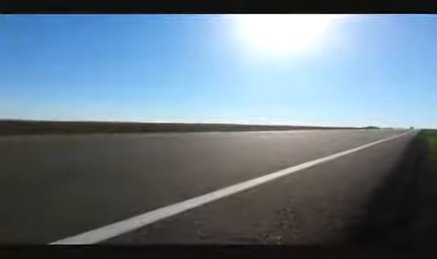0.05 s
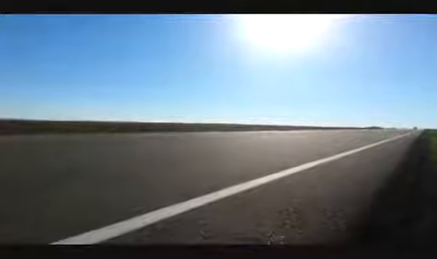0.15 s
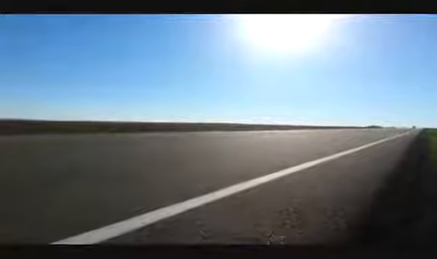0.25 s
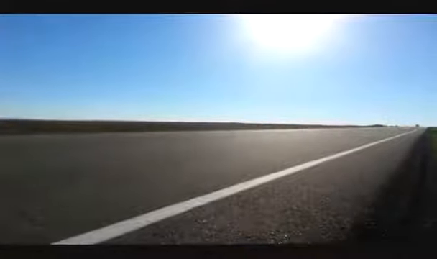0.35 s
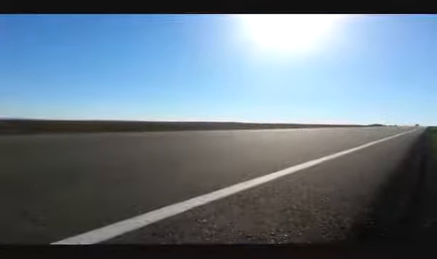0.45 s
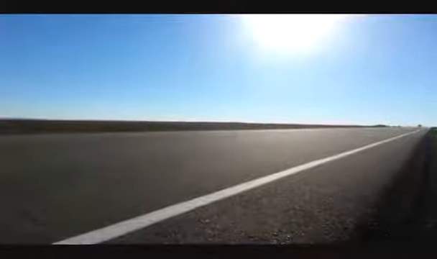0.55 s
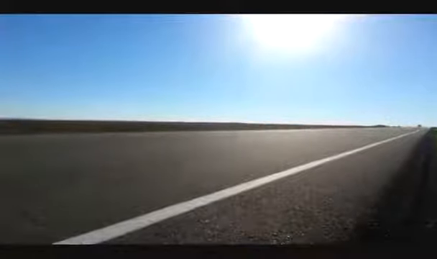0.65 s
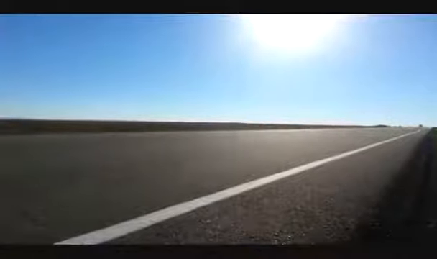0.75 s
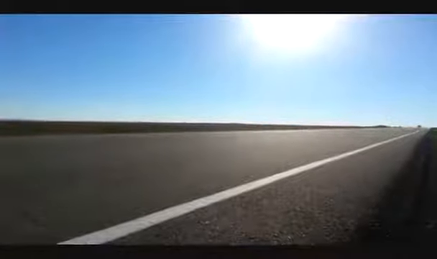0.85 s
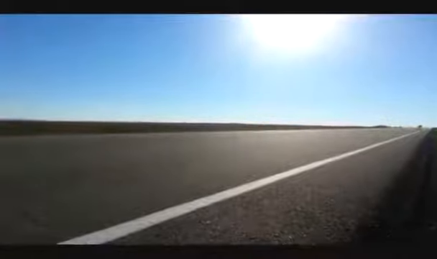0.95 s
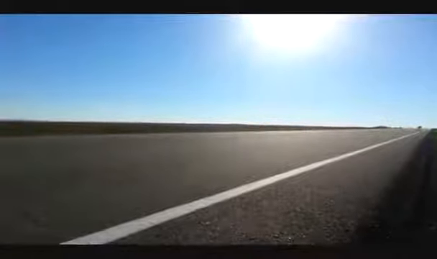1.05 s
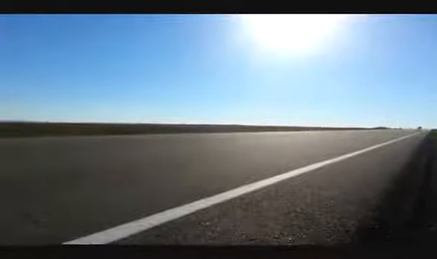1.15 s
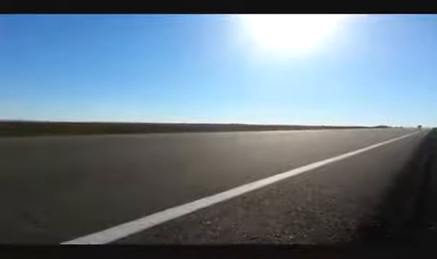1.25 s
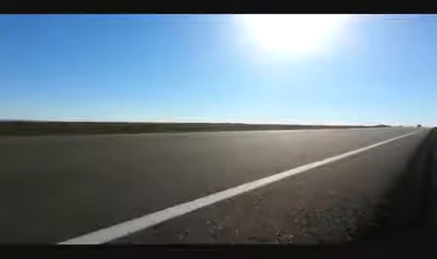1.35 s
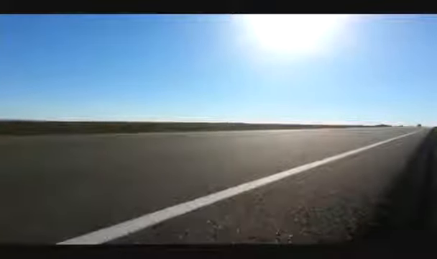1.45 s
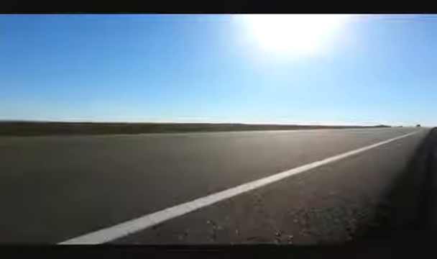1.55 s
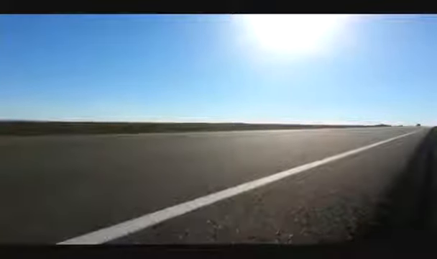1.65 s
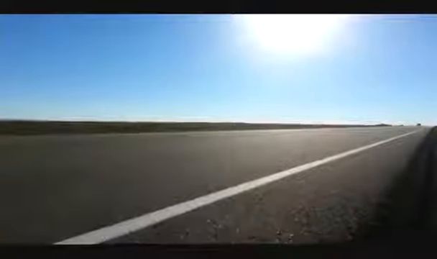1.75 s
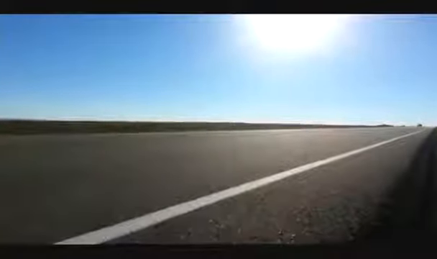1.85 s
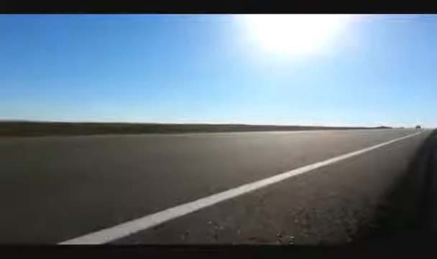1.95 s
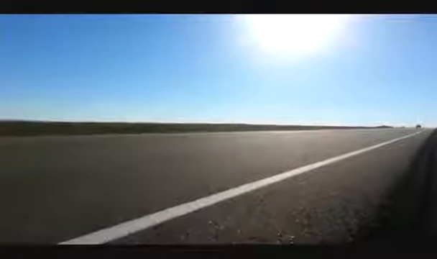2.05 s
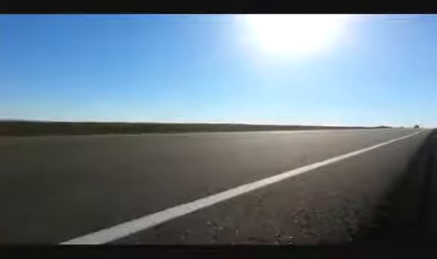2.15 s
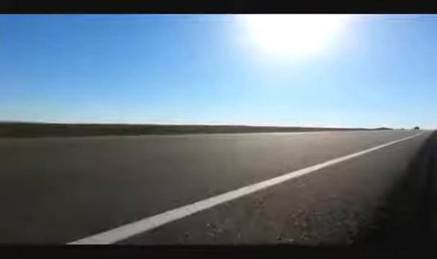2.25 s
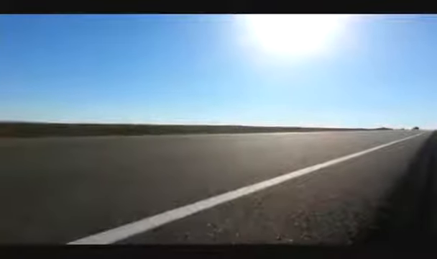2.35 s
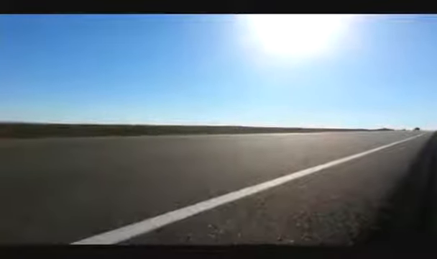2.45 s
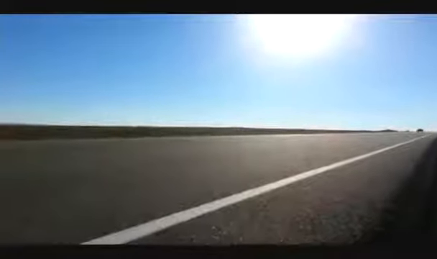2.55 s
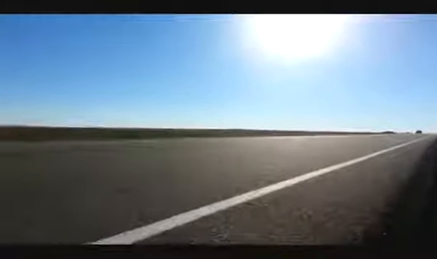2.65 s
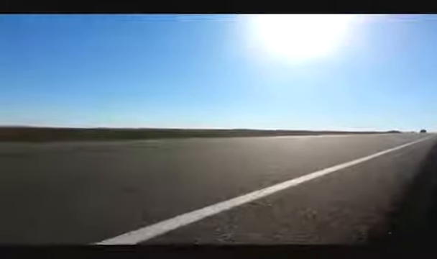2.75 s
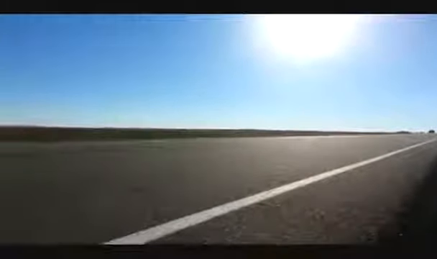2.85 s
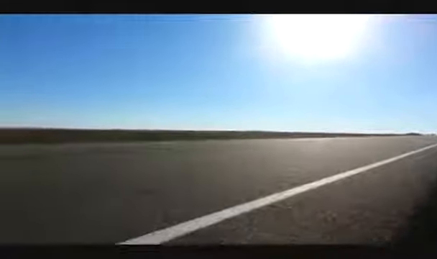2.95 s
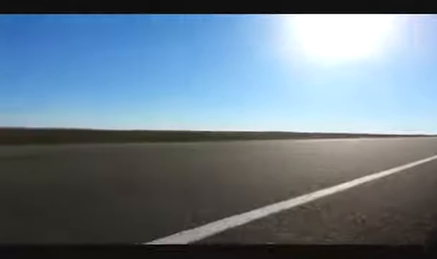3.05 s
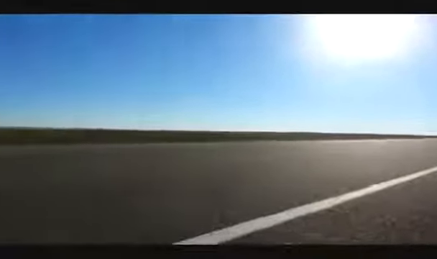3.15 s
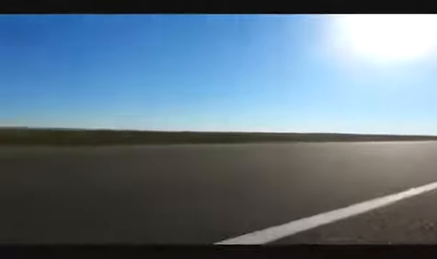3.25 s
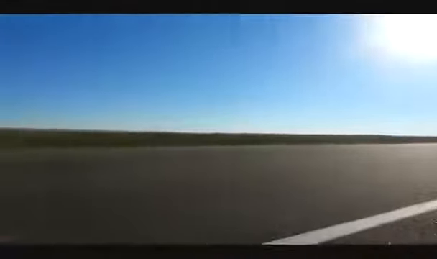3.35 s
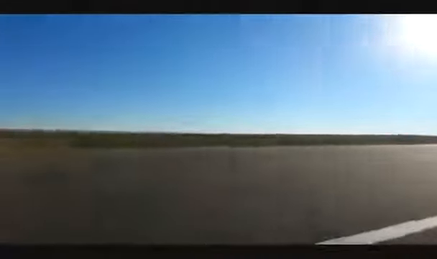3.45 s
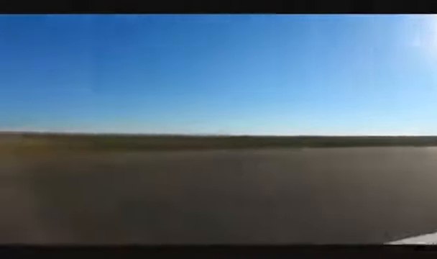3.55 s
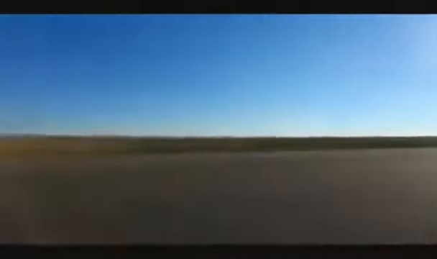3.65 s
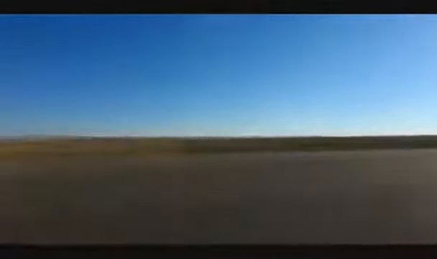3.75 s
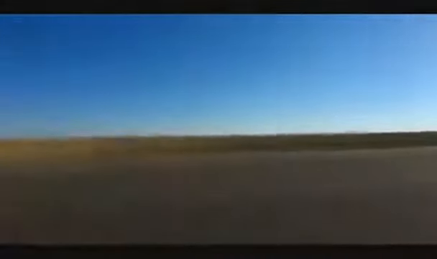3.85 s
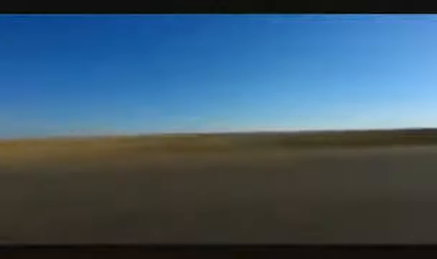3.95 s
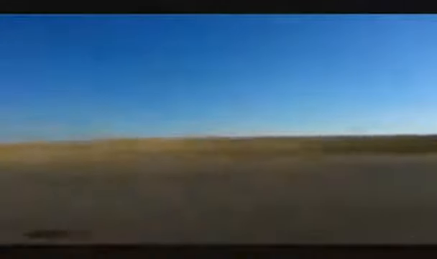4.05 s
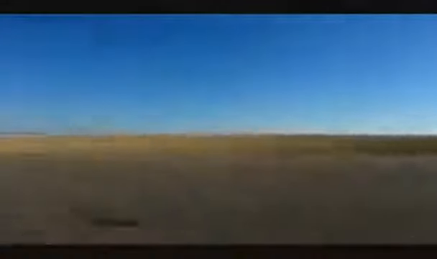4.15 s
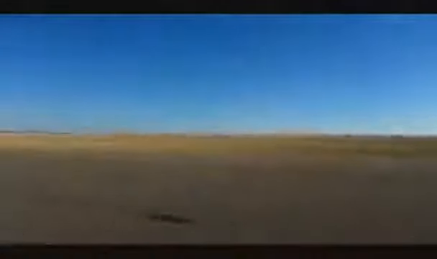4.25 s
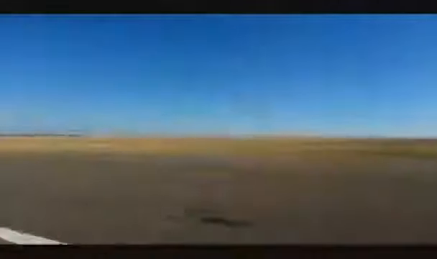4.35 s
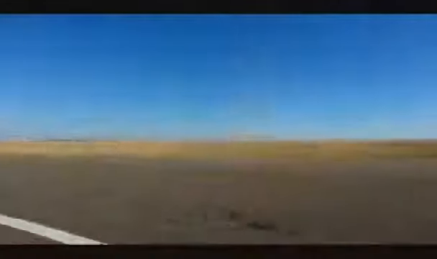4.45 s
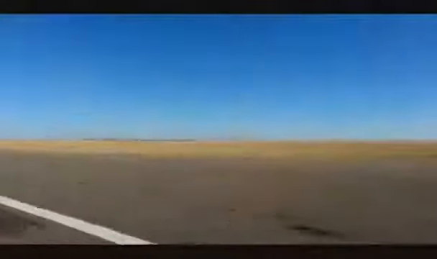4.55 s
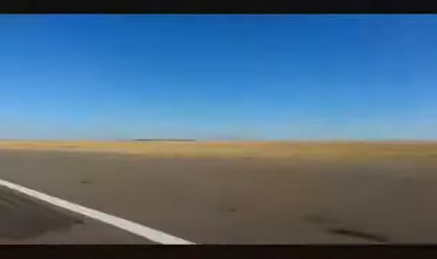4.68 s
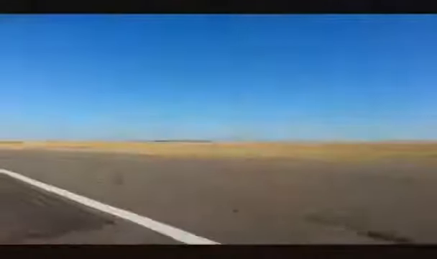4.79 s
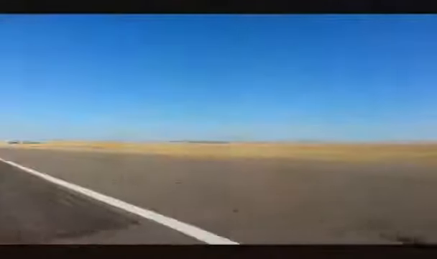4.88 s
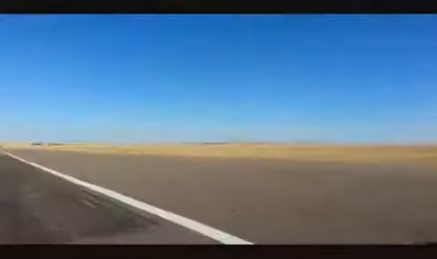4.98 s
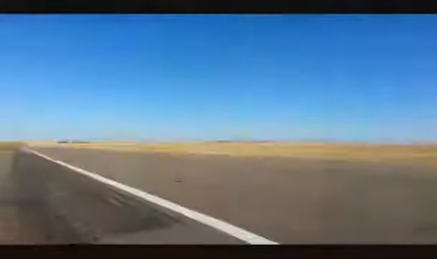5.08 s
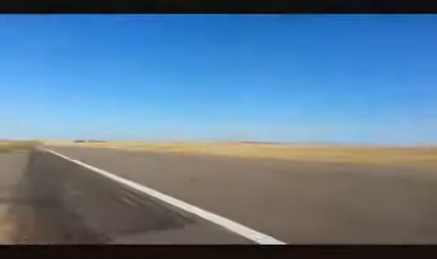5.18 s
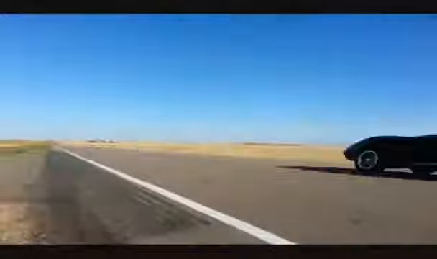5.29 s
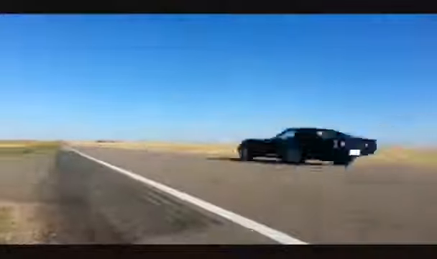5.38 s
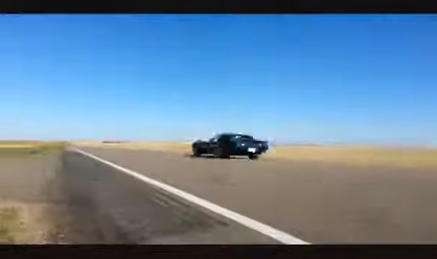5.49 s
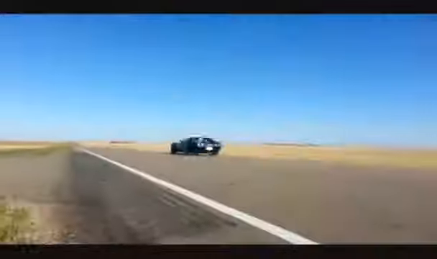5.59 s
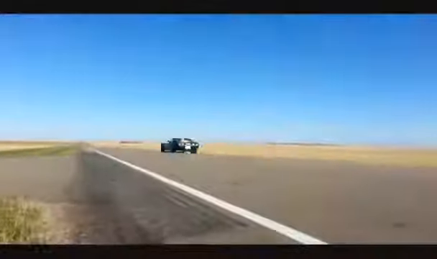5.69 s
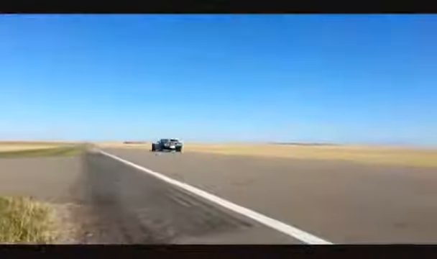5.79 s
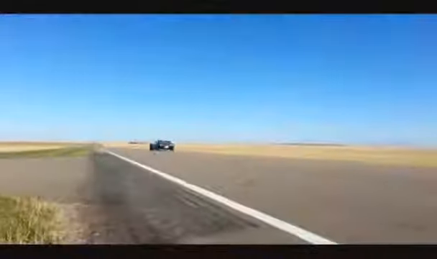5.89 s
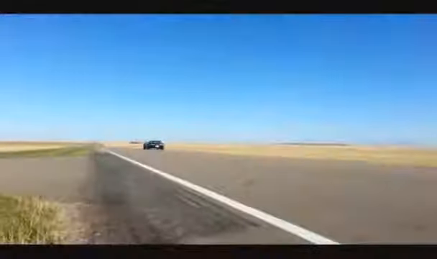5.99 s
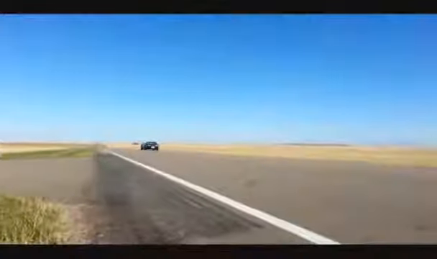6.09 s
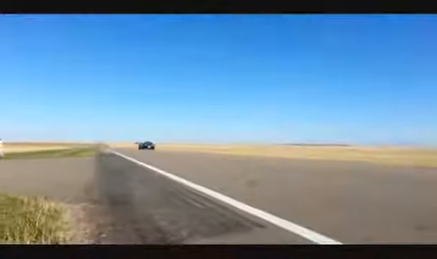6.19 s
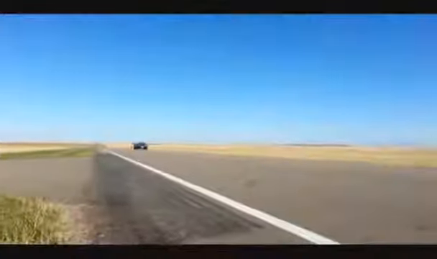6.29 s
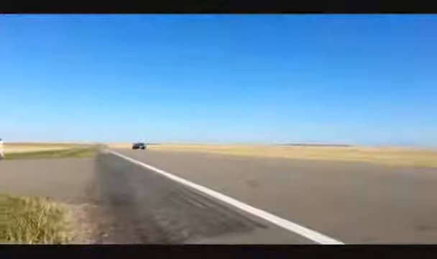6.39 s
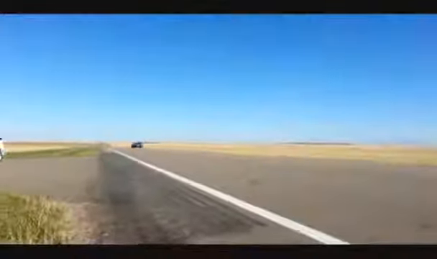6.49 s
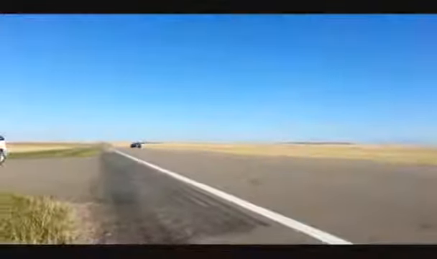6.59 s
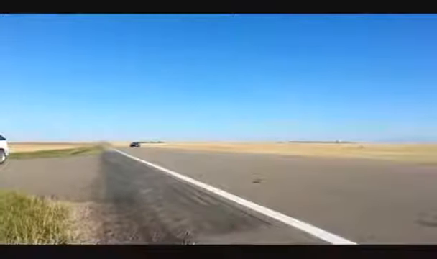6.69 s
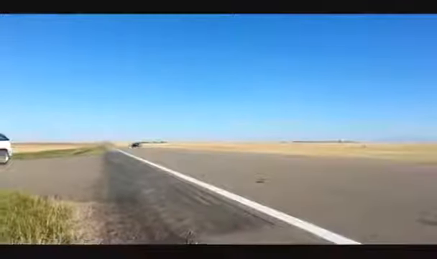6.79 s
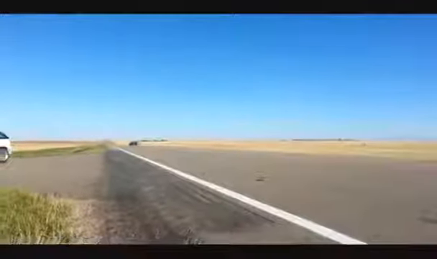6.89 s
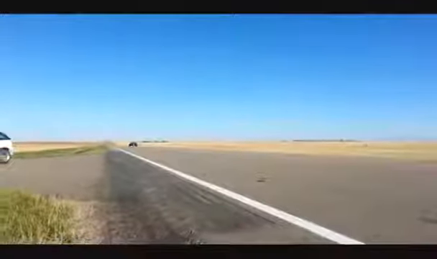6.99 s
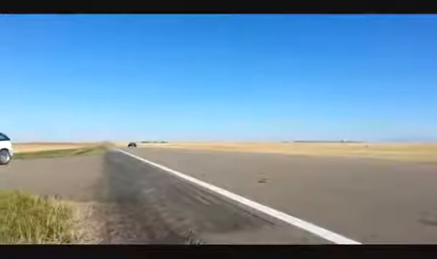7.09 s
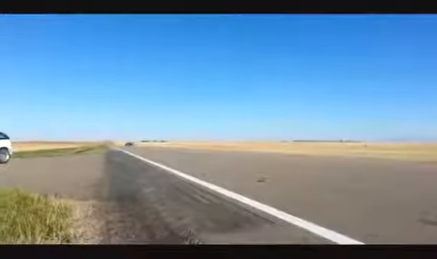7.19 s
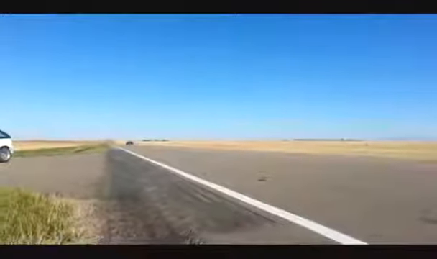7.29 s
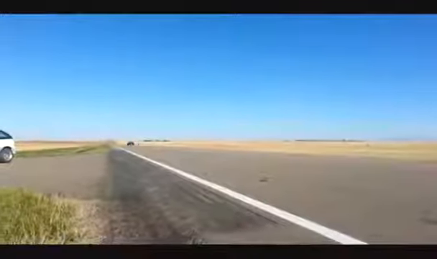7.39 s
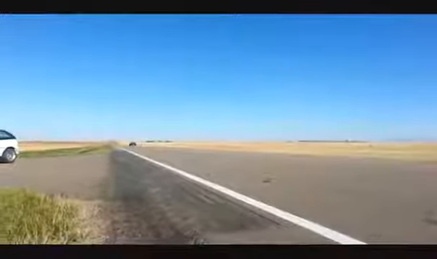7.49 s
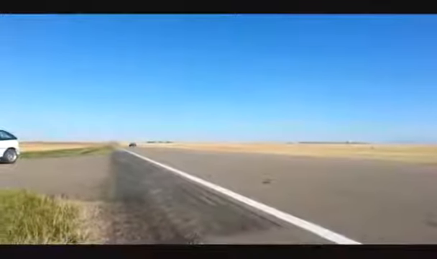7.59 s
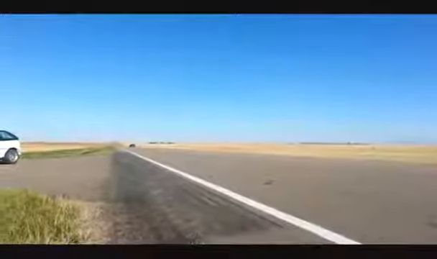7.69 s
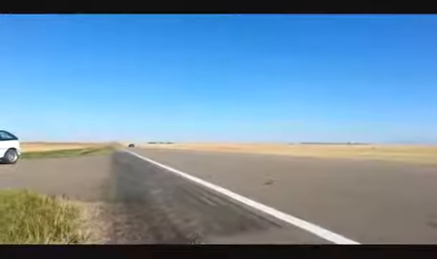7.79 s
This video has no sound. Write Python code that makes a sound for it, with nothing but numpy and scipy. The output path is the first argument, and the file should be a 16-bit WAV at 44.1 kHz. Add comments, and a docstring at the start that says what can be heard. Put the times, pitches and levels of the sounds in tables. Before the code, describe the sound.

Faint crickets and a buzzing grasshopper sound in a light prairie breeze while a V8 sports car drones far off at full throttle. The engine grows steadily louder as the insects fade, then roars past a few metres away, dropping sharply in pitch. Its wake buffets the hand-held microphone, which briefly overloads. The car recedes with a lower drone and comes off the throttle in the distance.

```python
"""A distant engine drones behind crickets and a grasshopper in a light prairie breeze. It is a V8 sports
car, flat out: it passes a few metres away, falls in pitch by the Doppler effect and lifts off far behind.
Periodic firings make its twin exhaust sing in orders of the engine cycle, and turbulent gas makes it roar;
tyre treads whine, air rushes by and the wake buffets the microphone. The insects sing by stridulation.
The hand-held camera turns after the car, takes one small knock and overloads at the pass."""
import sys
import numpy as np
from scipy import signal
from scipy.fft import rfft, irfft, next_fast_len
from scipy.io import wavfile
from scipy.ndimage import uniform_filter1d, map_coordinates

SR = 44100
rng = np.random.default_rng(int(sys.argv[2]) if len(sys.argv) > 2 else 0)


def persist_wave(psi):
    """Save psi, clipped to +-1, as 16-bit WAV."""
    counts = np.round(np.clip(psi, -1, 1) * 32767).astype(np.int16)
    wavfile.write(sys.argv[1], SR, np.atleast_2d(counts).T)


N = 345303

SPEED_M_S, SOUND_M_S = 48.5, 343
PASS_S, MISS_M = 5.401, 5.4  # when the car is heard abeam, and its distance then
LIFT_S, LIFT_TAKES_S = 6.78, 0.41  # the driver comes off the throttle
# the engine pulls in one gear, then sags: (time [s], engine cycle rate [Hz])
REVS = [(0, 33.62), (1.6, 35.35), (5.0, 37.6), (6.0, 37.88), (6.9, 38.09), (7.4, 37.57), (7.83, 37.34)]
# harmonic spectrum of the exhaust for each aspect: (order of the engine cycle, relative level [dB])
NOTE_FAR = [(1, -44), (2, -40), (3, -23), (4, -11), (5, -15), (6, -9.5), (7, -16), (8, 0), (9, -11.5),
            (10, -4.5), (11, -14.5), (12, -17), (13, -12), (14, -19), (15, -30), (16, -16.5)]
NOTE_NEAR = [(1, -54), (2, -33), (3, -19.5), (4, -11.5), (5, -27), (6, -11.5), (7, -11), (8, 0), (9, -4.5),
             (10, -15), (11, -2), (12, -25), (13, -1.5), (14, -35), (15, -29), (16, -16.5)]
NOTE_FRONT_QUARTER = [(1, -46), (2, -38), (3, -14.5), (4, -18), (5, -30), (6, -13), (7, -11), (8, 2),
                      (9, -1.5), (10, 0), (11, 0), (12, -24), (13, -3), (14, -17), (15, -20), (16, -8.5)]
NOTE_ABEAM = [(1, -42), (2, -36), (3, -18), (4, -20), (5, -13), (6, -15), (7, -8), (8, 0.5), (9, -6),
              (10, 0.5), (11, -1.5), (12, -13), (13, 2), (14, -12), (15, -15), (16, -15)]
NOTE_REAR_QUARTER = [(1, -44), (2, -30), (3, -16), (4, -11.5), (5, -31), (6, -21), (7, -22), (8, -1.5),
                     (9, -1), (10, 0), (11, 3), (12, -9), (13, -4.5), (14, -14), (15, -22), (16, -9.5)]
NOTE_REAR = [(1, -47), (2, -38), (3, -26), (4, -18.5), (5, -19.5), (6, -17), (7, -18), (8, -11), (9, 0),
             (10, -12), (11, 0.5), (12, -11), (13, -16), (14, -12), (15, -29), (16, -11.5)]
NOTE_LIFTED = [(1, -42), (2, -29), (3, -16.5), (4, -13.5), (5, -14.5), (6, -1), (7, -19), (8, -1), (9, 2),
               (10, -12), (11, 3), (12, -13.5), (13, -13), (14, -10.5), (15, -9), (16, -24)]
# road past the listener over which each note gives way to the next: (start [m], end [m])
BEAM_CHANGES = [(-153, -45), (-27, -18), (-6.5, -3.5), (1, 8), (14, 24)]
# destructive interference of the two tailpipes: (order, time [s])
PIPE_NULLS = [(5, 5.39), (5, 5.52), (13, 5.61), (9, 5.64), (11, 5.815)]
# spectrum of the exhaust's roar for each aspect: (frequency [Hz], relative level [dB])
ROAR_FAR = [(60, -28), (150, 2), (400, 6), (760, -2), (1000, 1), (1250, -1.5), (1600, -2), (2100, -6),
            (3200, -25.5), (4800, -26), (6500, -72)]
ROAR_NEAR = [(60, -38), (160, -1), (320, 2.5), (480, -2), (700, -1), (900, 0), (1400, -4.5), (2000, -2.5),
             (2600, -17.5), (4800, -33), (6500, -36)]
ROAR_ABEAM = [(60, -22), (160, -5), (300, 3.5), (480, 8.5), (750, 0), (1200, 1.5), (2000, 6), (2700, -2.5),
              (3400, -8.5), (4800, -36), (6500, -18.5)]
ROAR_REAR = [(60, -46), (160, -3), (300, -1.5), (480, -2.5), (850, -2.5), (1100, 1), (1220, 0.5), (1340, 2),
             (1500, -1), (1950, 2.5), (2350, -4.5), (2750, -3), (3200, -28), (6500, -62)]
ROAR_LIFTED = [(60, -39), (110, -14), (300, 0.5), (550, -2.5), (950, 4.5), (1150, 1), (1350, 1.5),
               (1600, 0), (2100, -1.5), (2700, -8), (4800, -33.5), (6500, -63)]
# tones of the tyre tread, at the car: (frequency [Hz], relative level [dB])
TREAD_TONES = [(1502, -0.5), (1551, 0.5), (1580, -5), (2067, -4.5), (2118, -9.5), (2239, -3.5)]
# spectra of rushing air and sprayed grit: (frequency [Hz], relative level [dB])
AIR_SPECTRUM = [(1800, -22), (3000, 3.5), (3800, 2), (4800, -3.5), (6000, -15.5), (8000, -42)]
GRIT_SPECTRUM = [(4000, 5), (6500, -1.5), (9000, 1.5), (12300, -1), (13300, -29)]
# attenuation with distance, one row coming and one going:
# (relative level close by [dB], reach [m], fall beyond it [dB per decade])
NOTE_CARRY = [(-5, 23.8, 32.5), (-8, 6.8, 9)]
DRONE_CARRY = [(-7, 70, 157), (-10.5, 36, 72)]
ROAR_CARRY = [(-12, 38.16, 41.46), (-11, 46.6, 27.7)]
TREAD_CARRY = [(-33, 57, 71), (-25.5, 57, 33)]
AIR_CARRY = [(-18, 45.4, 96), (-26, 87, 85)]
GRIT_CARRY = [(-31, 15.6, 60), (-28.5, 33, 85)]
# bands that swell or thin: (time [s], half length [s], centre [Hz], half width [octaves], gain [dB])
SURGES = [(2.8, 0.33, 2095, 0.42, -3.5), (3.5, 0.37, 1453, 0.2, -2.5), (3.5, 0.23, 2380, 0.33, 0.5),
          (4.2, 0.15, 1810, 0.17, 1.5), (4.25, 0.11, 3840, 0.56, -4), (4.602, 0.28, 1190, 0.26, 3),
          (4.357, 0.072, 2200, 0.2, 3.5), (5.224, 0.059, 3260, 0.4, -1), (6.096, 0.037, 1350, 0.38, 4),
          (6.303, 0.066, 1960, 0.43, 6), (6.423, 0.05, 1200, 0.58, 2.5), (6.777, 0.11, 1260, 0.65, 3.5),
          (7.258, 0.13, 1900, 0.24, 4.5), (7.42, 0.13, 1300, 0.28, -1), (7.658, 0.092, 1320, 0.8, 8)]
# diffraction notch at the left port: (direction [deg], frequency [Hz], gain [dB])
NOTCH = [(40, 1900, -3), (65, 1930, -9), (92, 1930, -13), (114.5, 2650, -15), (129.6, 5300, -2),
         (139, 12000, 0)]
# acoustic shadow of the camera's body: (frequency [Hz], left minus right [dB])
SHADE_RIGHT = [(200, 2.5), (700, 1), (1400, 2.5), (1900, -2), (2300, -3.5), (2800, -7.5), (3500, -13),
               (4400, -5.5), (5200, -1), (7000, 0.5)]
SHADE_FRONT = [(150, -0.5), (400, -0.5), (750, -2), (1300, -3), (1700, -5), (2600, 8.5), (3500, 6),
               (5000, -1.5)]
SHADE_LEFT = [(200, -0.5), (450, 0.5), (700, 0), (1000, -4), (1800, -0.5), (2500, 3.5), (3300, 5.5),
              (5500, 3), (8000, 2)]
SHADE_BEHIND = [(200, 1), (450, -1.5), (800, 4), (1500, 8), (2100, 6), (2700, -0.5), (3500, -4),
                (5000, -11), (8000, -8)]
# where the car lies for each of those four shadows: (direction [deg])
SHADE_DEG = [-19.5, 29, 116, 146]
# puffs of wind, the strongest from the car's wake: (time [s], half length [s], level [dB])
GUSTS = [(1.06, 0.054, -52), (1.851, 0.27, -53.5), (3.4, 0.47, -55.5), (5.19, 0.1, -32), (5.58, 0.25, -41)]
# cricket chirps, slow runs between quick bursts: (start [s], end [s], stroke rate [Hz], level [dB])
CHIRPS = [(0, 0.023, 50, -56), (0.19, .52, 28, -57), (0.616, .8, 26.5, -56), (0.945, 1.06, 51, -54.5),
          (1.215, 1.55, 22, -55), (1.652, 1.78, 60, -56), (1.895, 2.3, 21.4, -56.5), (2.37, 2.488, 58, -55),
          (2.637, 2.88, 24.5, -55.5), (2.942, 3.04, 35, -56), (3.238, 3.36, 56, -61)]
# grasshopper's buzzes: (start [s], end [s], level [dB])
BUZZES = [(-.6, 0.26, -55.5), (0, 3.1, -63.5), (1.65, 3.74, -57), (6.9, 8.7, -71.5)]
# bursts of bright crackle: (time [s], half length [s], level [dB])
CRACKLES = [(5.4, .045, -31), (5.78, .04, -45), (6.09, 0.023, -56), (6.302, .016, -50)]
# spectra of wind, grasshopper, small cricket, dry grass and crackle: (frequency [Hz], relative level [dB])
WIND_SPECTRUM = [(15, 7), (40, -10.5), (80, 16.5), (130, 9.5), (250, -26), (600, -50)]
RASP_SPECTRUM = [(7000, -30), (9800, 0), (11000, 3), (12600, 7), (14200, 0), (16000, -24)]
TRILL_SPECTRUM = [(7600, -23), (8150, -6), (8450, -3), (8900, -12)]
GRASS_SPECTRUM = [(100, -23.5), (1000, 7), (3000, 11.5), (5000, 4), (6200, -9.5), (8300, 1.5),
                  (10000, -5.5), (14000, -18.5)]
CRACKLE_SPECTRUM = [(2500, -14), (6000, -7), (9000, 10), (12000, 0), (14000, -13)]


def undb(db):
    """Amplitude ratio of a level in decibels."""
    return 10 ** (np.asarray(db) / 20)


def ramp(x, start, end):
    """Linear transition from 0 at start to 1 at end."""
    return np.clip((x - start) / (end - start), 0, 1)


def noise():
    """Gaussian white noise of unit power."""
    return rng.standard_normal(N)


def walk(rate):
    """Low-pass random fluctuation: values held 1 / rate s and smoothed twice, with spread near 1."""
    hold = max(int(SR / rate), 2)
    steps = np.repeat(rng.standard_normal(N // hold + 1), hold)
    return 1.3 * uniform_filter1d(uniform_filter1d(steps, hold), hold)[:N]


def shape(x, points):
    """Zero-phase filter through (frequency [Hz], gain [dB]) points, flat beyond the ends."""
    size = next_fast_len(N)
    hz, db = np.transpose(points)
    f = np.arange(size // 2 + 1) * SR / size
    gain = undb(np.interp(np.log(f + 1), np.log(hz), db))
    return irfft(rfft(x, size) * gain, size)[..., :N]


def colour(x, points, band=slice(None)):
    """Spectral shaping, falling above the last point; unit white noise gets unit power in band [Hz]."""
    points = np.vstack([points, (2 * points[-1][0], points[-1][1] - 20)])
    power = undb(np.interp(np.log(np.arange(SR // 2) + 1), np.log(points[:, 0]), points[:, 1])) ** 2
    return shape(x, points) / np.sqrt(power[band].sum() / len(power))


def spread(x, share):
    """Partial coherence: a share of a white sound's power is scattered and differs between channels."""
    return np.sqrt(1 - share) * x + np.sqrt(share) * np.array([noise(), noise()])


def drive_by():
    """Retarded position: metres past the listener, and distance, when the sound now heard left the car."""
    mach = SPEED_M_S / SOUND_M_S
    present_m = SPEED_M_S * (np.arange(N) / SR - PASS_S) + mach * MISS_M
    squeeze = 1 - mach ** 2
    distance = (np.sqrt(present_m ** 2 + squeeze * MISS_M ** 2) - mach * present_m) / squeeze
    return present_m - mach * distance, distance


def going(along, early_m=0.76, turn_m=2.1):
    """Source orientation: 0 while the nose faces the listener, 1 once the tail does."""
    return (1 + np.tanh((along + early_m) / turn_m)) / 2


def lifted_off():
    """Loss of engine load: 0 at full throttle, 1 with the throttle shut."""
    return ramp(np.arange(N) / SR, LIFT_S, LIFT_S + LIFT_TAKES_S)


def carried(path, carry, abeam_db=0, lift_db=0):
    """Attenuation with distance: one sound's level [dB], also set by orientation and throttle."""
    along, distance = path
    nose, tail = (db - fall * np.log10(np.hypot(1, distance / reach)) for db, reach, fall in carry)
    facing = nose + (tail - nose) * going(along)
    return facing + abeam_db * (MISS_M / distance) ** 2 + lift_db * lifted_off()


def beams(along):
    """Directivity of the note: each spectrum gives way to the next as the car travels, then lifts off."""
    changes = [ramp(along, start, end) for start, end in BEAM_CHANGES]
    reached = np.array([np.ones(N), *changes, lifted_off(), np.zeros(N)])
    return reached[:-1] - reached[1:]


def pipes_cancel(order, half_s=0.06):
    """Interference of the two tailpipes: at each null an order fades and returns with opposite sign."""
    t, gain = np.arange(N) / SR, 1
    for cancelled, s in PIPE_NULLS:
        if round(cancelled) == order:
            gain = gain * np.tanh((t - s) / half_s)
    return gain


def exhaust_note(cycle, along, note_db, drone_db, waver_db=1.27):
    """Harmonic series: uneven firings in each bank sound every order of the engine cycle."""
    notes = [NOTE_FAR, NOTE_NEAR, NOTE_FRONT_QUARTER, NOTE_ABEAM,
             NOTE_REAR_QUARTER, NOTE_REAR, NOTE_LIFTED]
    strength = undb(np.array(notes)[:, :, 1])
    strength /= np.sqrt(np.sum(strength[:, 5:14] ** 2, axis=1, keepdims=True))  # unit power, orders 6-14
    note, views, out = undb(note_db), beams(along), 0
    slip_rad = 0.016 + 0.022 * lifted_off()  # firing times scatter more off the throttle
    for order, by_view in enumerate(strength.T, 1):
        size = note * (by_view @ views) * undb(waver_db * walk(9))
        if order == 5:  # booms only at close range, along the line of the car
            size = size + undb(drone_db + 0.63 * walk(16))
        scatter = slip_rad * order * walk(45)  # blurs the high orders most
        lag = 0.09 * order ** 2  # dispersion in the pipes spreads the firings over the cycle
        out = out + size * pipes_cancel(order) * np.sin(2 * np.pi * (order * cycle - lag) + scatter)
    return np.sqrt(2) * out


def aspects(path, near_m=48, far_m=142):
    """Directivity of the roar: shares of far ahead, near ahead, abeam, rear and off the throttle."""
    along, distance = path
    flank = 0.59 * (1 - ramp(distance, 2.9, 42))  # heard only close by
    nose, tail = (1 - flank) * (1 - going(along)), (1 - flank) * going(along)
    far, lifted = ramp(distance, near_m, far_m), lifted_off()
    return np.array([nose * far, nose * (1 - far), flank, tail * (1 - lifted), tail * lifted])


def exhaust_roar(cycle, views, repeat=0.25, depth=0.095, lope=0.073, flutter_db=0.47):
    """Modulated turbulence: gas bursts out at each of eight firings, and part repeats every cycle."""
    pattern = rng.standard_normal(1024)
    place = (cycle + .002 * walk(20)) % 1 * len(pattern)
    gas = np.sqrt(repeat) * pattern[place.astype(int) % len(pattern)] + np.sqrt(1 - repeat) * noise()
    firing = np.cos(2 * np.pi * 8 * cycle)
    banks = (np.cos(2 * np.pi * cycle) + np.cos(4 * np.pi * cycle + 1) + np.cos(6 * np.pi * cycle)) / 2
    puffs = np.exp(depth * firing + lope * banks)
    gas = spread(gas, share=0.12) * puffs / np.sqrt(np.mean(puffs ** 2))
    spectra = [ROAR_FAR, ROAR_NEAR, ROAR_ABEAM, ROAR_REAR, ROAR_LIFTED]
    roar = sum(view * colour(gas, points, band=slice(700, 2800)) for view, points in zip(views, spectra))
    return roar * undb(flutter_db * walk(22))  # moving air on the way makes it flutter


def comb(x, delay_ms, strength):
    """Comb filtering: a sound interferes with its delayed copy, keeping about the same power."""
    now = np.arange(N)
    echo = np.interp(now - delay_ms * SR / 1000, now, x)
    return (x + strength * echo) / np.sqrt(1 + strength ** 2)


def road_echo(x, strength=0.2, delay_ms=0.918, wander=0.29):
    """Ground reflection: the road mirrors the roar, and eddies keep changing the extra path."""
    path_ms = delay_ms * np.exp(wander * walk(5))
    return np.array([comb(port, path_ms, strength) for port in x])


def eddies(x, patchy_db=1.5, patch_hz=16):
    """Scintillation: moving air makes bands of the car's noise swell and thin; besides, a few bands swell or
    thin strongly at set times."""
    f, t, bins = signal.stft(x, SR, nperseg=512)
    octave = np.log2(f[:, None] + 1)
    gain_db = sum(db * np.exp(-((t - s) / half) ** 2 - ((octave - np.log2(hz)) / width) ** 2)
                  for s, half, hz, width, db in SURGES)
    for centre in np.arange(9.5, 12.1, .5):  # half octaves from about 700 to 4100 Hz
        swell_db = patchy_db * np.interp(t * SR, np.arange(N), walk(patch_hz))
        gain_db = gain_db + swell_db * np.exp(-(3 * (octave - centre)) ** 2)
    return signal.istft(bins * undb(gain_db), SR)[1][..., :N]


def off_axis(along, start_s=2.855, end_s=5.12, start_deg=31.2, end_deg=157.8):
    """Angle of incidence [rad] as the camera swings once; its aim counts from the car's approach road."""
    turned = (1 - np.cos(np.pi * ramp(np.arange(N) / SR, start_s, end_s))) / 2
    aim = np.radians(start_deg + (end_deg - start_deg) * turned)
    return aim - np.arctan2(MISS_M, -along)


def holder_echo(x, along, angle, right_share=0.7, near_m=45, far_m=70):
    """Reflection off whoever holds the camera combs the noise; the comb sweeps with the car's angle."""
    delay_ms = 2.62 + 0.57 * np.cos(angle)  # later when the car is in front
    strength = 0.11 + 0.2 * ramp(-along, near_m, far_m)  # strongest while it is far ahead
    return np.array([comb(x[0], delay_ms, strength), comb(x[1], delay_ms, right_share * strength)])


def notched(x, angle, octaves=0.17):
    """Diffraction: sound bending round the camera cancels in a notch that climbs as the car goes behind."""
    f, t, bins = signal.stft(x, SR, nperseg=512)
    deg = np.interp(t, np.arange(N) / SR, np.degrees(angle))
    at_deg, hz, db = np.transpose(NOTCH)
    away = np.log2((f[:, None] + 1) / np.interp(deg, at_deg, hz)) / octaves
    gain_db = np.interp(deg, at_deg, db) * np.exp(-away ** 2)
    return signal.istft(bins * undb(gain_db), SR)[1][:N]


def ports(sound, angle, gap_ms=0.44):
    """Time and level differences: the nearer microphone port hears first; the camera casts a shadow."""
    shift = gap_ms * np.sin(angle) * SR / 1000 / 2
    shades = [SHADE_RIGHT, SHADE_FRONT, SHADE_LEFT, SHADE_BEHIND]
    shares = [np.interp(np.degrees(angle), SHADE_DEG, row) for row in np.eye(len(shades))]
    out = []
    for x, side in ((notched(sound[0], angle), 1), (sound[1], -1)):
        shaded = sum(share * shape(x, np.array(shade) * (1, side / 2))
                     for share, shade in zip(shares, shades))
        out.append(map_coordinates(shaded, [np.arange(N) + side * shift], order=3, mode="nearest"))
    return np.array(out)


def car():
    """A moving source: pitch follows the Doppler shift, level the distance, timbre the side heard."""
    path = along, distance = drive_by()
    revs = np.interp(np.arange(N) / SR, *np.transpose(REVS))
    doppler = 1 / (1 + SPEED_M_S / SOUND_M_S * along / distance)
    cycle = np.cumsum(revs * doppler) / SR
    angle = off_axis(along)
    note_db = carried(path, NOTE_CARRY, abeam_db=1.5, lift_db=-9.0)
    drone_db = carried(path, DRONE_CARRY, abeam_db=-9, lift_db=-12)
    roar_db = carried(path, ROAR_CARRY, abeam_db=1.5, lift_db=-3.5)
    roar = road_echo(exhaust_roar(cycle, aspects(path))) * undb(roar_db)
    whine = tread(doppler) * undb(carried(path, TREAD_CARRY))
    noises = holder_echo(eddies(roar + whine + rush(path)), along, angle)
    return ports(exhaust_note(cycle, along, note_db, drone_db) + noises, angle)


def swells(table):
    """Sum of Gaussian envelopes from (time [s], half length [s], level [dB]) rows."""
    t = np.arange(N) / SR
    return sum(undb(db) * np.exp(-((t - s) / half) ** 2) for s, half, db in table)


def wind(breeze_db=-63, lull_db=2, buffet_db=0.5):
    """Turbulent pressure: a light breeze, then the car's wake, rumbles on the microphone ports."""
    flow = undb(breeze_db + lull_db * walk(3)) + swells(GUSTS)
    return colour(spread(noise(), share=0.26), WIND_SPECTRUM) * flow * undb(buffet_db * walk(5.7))


def cricket(stroke_s=0.0284, high_hz=5270, low_hz=4550, gain_db=2.0, scrape_rad=0.86):
    """Stridulation: each unevenly timed wing stroke is a scraped whistle that falls as the wing slows."""
    out = np.zeros((2, N + SR))
    progress = np.linspace(0, 1, int(stroke_s * SR))
    glide_hz = high_hz + (low_hz - high_hz) * progress
    wobble = scrape_rad * np.array([walk(700), walk(700)])
    for start, end, stroke_rate, db in CHIRPS:
        for s in np.arange(start, end - stroke_s / 2, 1 / stroke_rate):
            detune, swell_db, late = rng.standard_normal(3)
            phase = 2 * np.pi * np.cumsum(glide_hz * (1 + 0.019 * detune)) / SR
            onset = max(int((s + .004 * late) * SR), 0)
            span = slice(onset, onset + len(progress))
            stroke = np.sin(phase + rng.normal(0, 1, (2, 1)) + wobble[:, span])
            out[:, span] += undb(db + gain_db + swell_db) * np.sin(np.pi * progress) * stroke
    return out[:, :N]


def strokes(rate_hz, sharp, unsteady=0.018):
    """Amplitude modulation by an insect's nearly even strokes, at unit power."""
    phase = np.cumsum(rate_hz * (1 + unsteady * walk(4.06))) / SR
    swell = np.exp(sharp * np.cos(2 * np.pi * phase))
    return swell / np.sqrt(np.mean(swell ** 2))


def grasshopper(rise_s=0.52, fall_s=0.12, rough_db=0.7):
    """Broadband stridulation: quick rasping strokes run together into high buzzes."""
    t = np.arange(N) / SR
    buzz = sum(undb(db) * ramp(t, start, start + rise_s) * (1 - ramp(t, end, end + fall_s))
               for start, end, db in BUZZES)
    rasp = spread(noise(), share=1.0) * undb(rough_db * walk(180))
    return colour(rasp, RASP_SPECTRUM) * buzz * strokes(rate_hz=45.2, sharp=0.36)


def dry_grass(level_db=-59):
    """Stationary noise: the faint hiss of dry grass, partly coherent between the channels."""
    return colour(spread(noise(), share=0.51), GRASS_SPECTRUM) * undb(level_db)


def small_cricket(start_s=0.23, end_s=2.9, fade_s=0.35, level_db=-68):
    """Narrowband stridulation: wing strokes pulse a thin, high trill."""
    t = np.arange(N) / SR
    singing = ramp(t, start_s, start_s + fade_s) * (1 - ramp(t, end_s, end_s + fade_s))
    band = colour(spread(noise(), share=1.0), TRILL_SPECTRUM)
    return band * strokes(rate_hz=13.0, sharp=0.78) * singing * undb(level_db)


def tread(doppler, blur_rad=0.79, waver_db=2.5):
    """Periodic excitation: the tyres' tread blocks whine in a few unsteady, Doppler-shifted tones."""
    clock = np.cumsum(doppler) / SR
    return sum(undb(db + waver_db * walk(12)) * np.sin(2 * np.pi * hz * clock + blur_rad * walk(25))
               for hz, db in TREAD_TONES)


def rush(path, grain_db=3, dull_m=45):
    """Flow noise: air tears round the body, and the tyres spray grit that dulls with distance."""
    along, distance = path
    air_db = carried(path, AIR_CARRY, abeam_db=-14.0, lift_db=-4.5)
    grit_db = carried(path, GRIT_CARRY, abeam_db=8.0)
    scattered = 0.13 + 0.55 * going(along)  # compact ahead, diffuse in the wake
    air = colour(spread(noise(), share=scattered), AIR_SPECTRUM) * undb(air_db + walk(30))
    grains = spread(noise(), share=1.0) * undb(grain_db * walk(900))
    grit = colour(grains, GRIT_SPECTRUM) * undb(grit_db)
    dulled = shape(grit, [(8000, 12.0), (10000, -15.0), (12500, -32)])
    return air + grit + (dulled - grit) * ramp(distance, MISS_M, dull_m)


def hand_knock(at_s=3.345, level_db=-29, decay_s=0.0088):
    """A damped impact: one small knock from the hand that turns the camera."""
    age = np.arange(N) / SR - at_s
    knock = spread(noise(), share=0.41) * (age >= 0) * np.exp(-abs(age) / decay_s)
    return colour(knock, [(700, -23), (1200, 1), (1700, 4), (2200, -13), (4000, -48)]) * undb(level_db)


def crackle(grain_db=5):
    """Randomly modulated noise: bright crackle flares as the car goes by and a few times after."""
    grains = undb(grain_db * walk(700))
    grains /= np.sqrt(np.mean(grains ** 2))
    return colour(spread(noise(), share=0.85) * grains, CRACKLE_SPECTRUM) * swells(CRACKLES)


def scene():
    """Superposition in the open air: car, wind, insects and grass, then a knock and the crackle."""
    return (car() + wind() + cricket() + grasshopper() + dry_grass() + small_cricket()
            + hand_knock() + crackle())


def record(dry, gain_db=0.04, top_hz=14300):
    """Saturation and band limiting: the camera flattens the loudest peaks and cuts the top."""
    x = dry * undb(gain_db)
    flattened = x / (1 + x ** 30) ** (1 / 30)
    return signal.sosfilt(signal.ellip(8, .2, 70, top_hz, fs=SR, output="sos"), flattened)


dry = scene()
out = record(dry)
persist_wave(out)
```